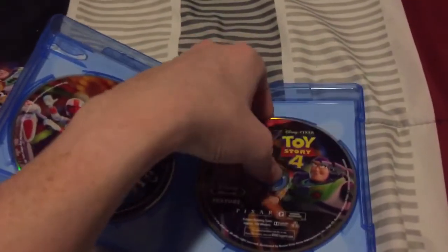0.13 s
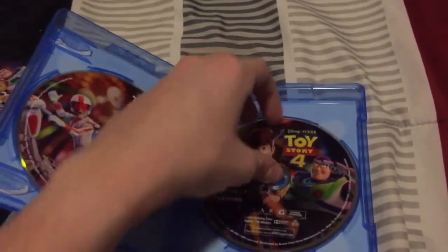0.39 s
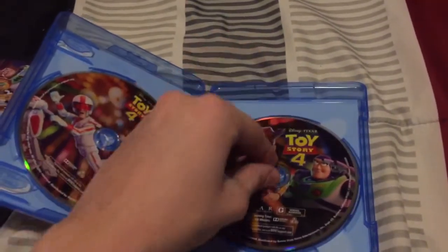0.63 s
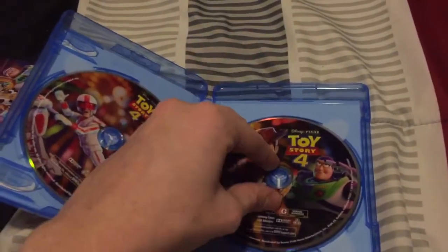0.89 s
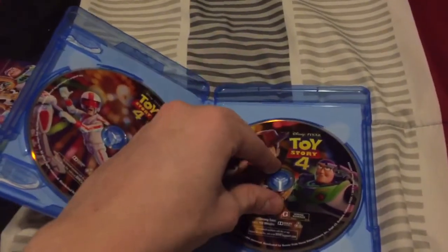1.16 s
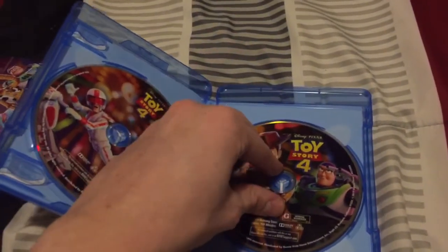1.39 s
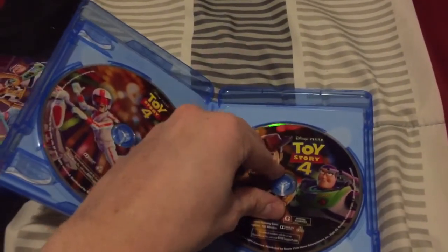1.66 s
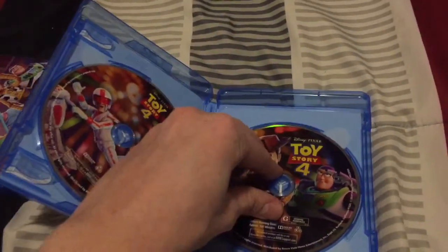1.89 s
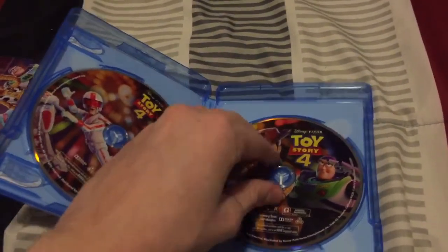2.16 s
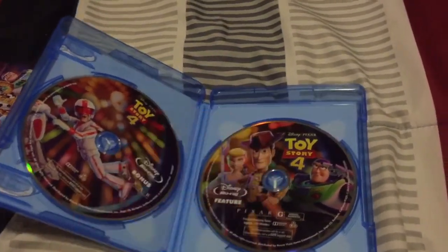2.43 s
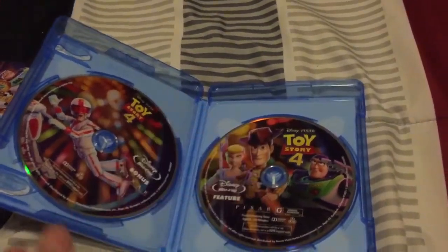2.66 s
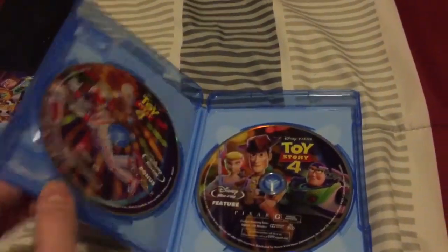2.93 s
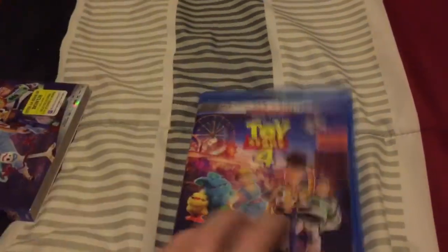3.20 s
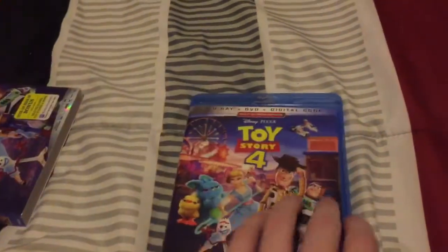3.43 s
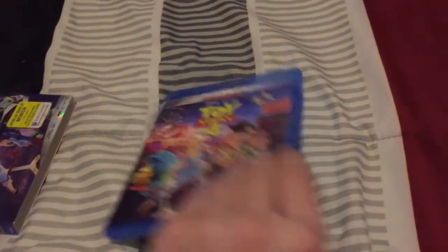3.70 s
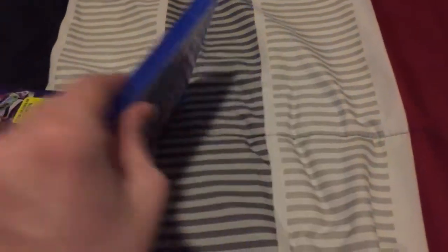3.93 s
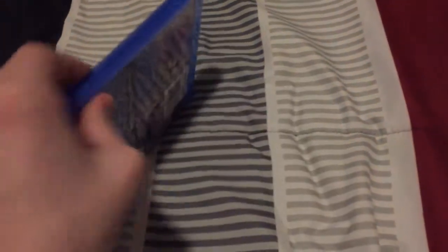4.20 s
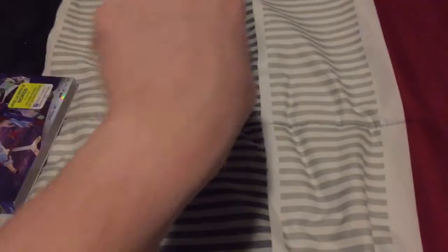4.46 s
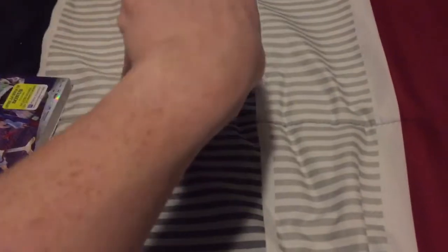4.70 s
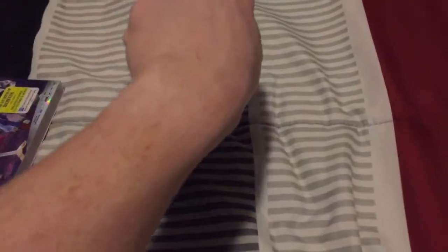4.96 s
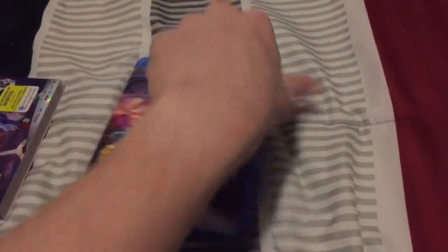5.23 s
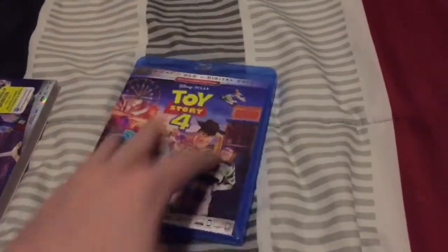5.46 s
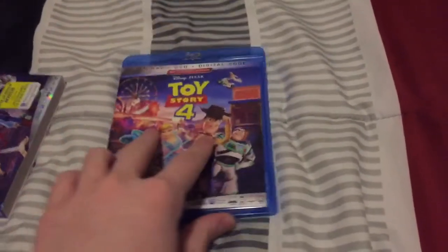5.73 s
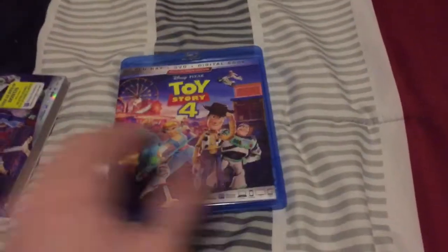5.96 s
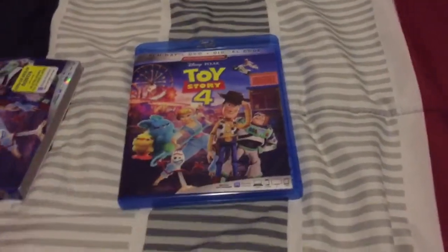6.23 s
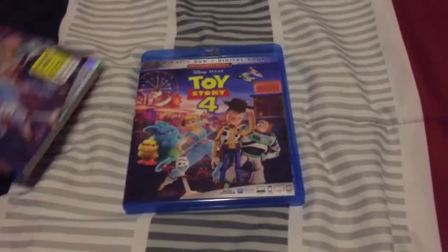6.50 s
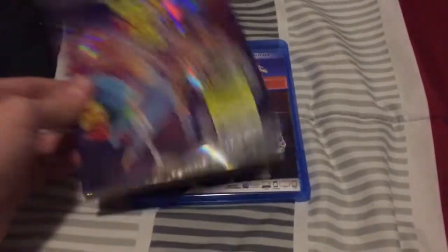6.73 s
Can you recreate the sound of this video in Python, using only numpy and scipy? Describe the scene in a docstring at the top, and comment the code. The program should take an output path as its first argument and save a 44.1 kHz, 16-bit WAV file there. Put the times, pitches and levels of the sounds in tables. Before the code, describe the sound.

Close to a small microphone in a soft-furnished room, a thin plastic disc case is handled. Faint clicks and scuffs come first, then a sharp snap with a low thump as the disc seats. Quiet hinge ticks and rustles lead to two very loud closing snaps about a second apart, softer clatter as it is put down, and a final moderate click. A low appliance hum and soft hiss continue throughout.

```python
"""Disc case handled on a bed

A thin plastic case snaps, clicks and ticks close to a small microphone: runs of slips ring shell and rib modes.
Fingers scuff the shell, crinkle the film sleeve and squeak once (banded grains); pushes thump (damped sines).
A small soft-furnished room answers (sparse decaying reflections); an appliance hums beyond the wall
(wavering tones, narrow noise bands) over broad hiss."""
import sys
import numpy as np
from scipy import signal
from scipy.fft import rfft, irfft, next_fast_len
from scipy.io import wavfile

SR = 44100
rng = np.random.default_rng(int(sys.argv[2]) if len(sys.argv) > 2 else 0)


def pcm_store(signal):
    """Save signal as 16-bit PCM."""
    levels = np.round(np.clip(np.atleast_2d(signal), -1, 1) * 32767)
    wavfile.write(sys.argv[1], SR, levels.astype(np.int16).T)


def boost_factor(decibels):
    """Convert a level in decibels to a linear amplitude factor."""
    exponent = np.asarray(decibels, float) / 20
    return 10 ** exponent


N = 302967  # samples

# brief ring of the case shell, before detuning and damping: mode_hz, level_db, t60_s
SHELL_MODES = [(746, -5.5, .008), (950.6, -1.5, 0.015), (1200, 0.5, 0.0089), (1474, 0, 0.0053),
               (1750, -8, 0.011), (2023, -2.5, 0.013), (2427, -1, 0.011), (2950, -3, 0.0098),
               (3480, -2.5, 0.012), (4230, 1, 0.0089), (5300, 2.5, 0.0055)]
# crack of ribs and clasps, before detuning and damping: mode_hz, level_db, t60_s
RIB_MODES = [(6300, 4, 0.004), (7200, -1.5, 0.0096), (8316, -4, 0.015), (9130, -2, .005),
             (9800, -8.5, 0.013), (11200, -5, .004), (11667, -6, 0.0026), (14300, -12.5, .003),
             (14500, -11.5, .003)]


def evened(x):
    """Scales to rms 1."""
    return x / np.sqrt(np.mean(x ** 2) + 1e-24)


def read(points, hz):
    """Interpolates a table on a log-frequency axis."""
    point_hz, value = np.transpose(points)
    return np.interp(np.log(hz + 1), np.log(point_hz + 1), value)


def add(mix, start_s, sound):
    """Mixes a sound in at start_s, cut at the end of the mix."""
    part = mix[round(start_s * SR):][:len(sound)]
    part += sound[:len(part)]


def coloured(x, points):
    """Filters x by a table of (hz, db), then scales to rms 1."""
    size = next_fast_len(len(x))
    gain = boost_factor(read(points, np.fft.rfftfreq(size, 1 / SR)))
    return evened(irfft(rfft(x, size) * gain, size)[:len(x)])


def clicks():
    """Quick slips excite shell and rib modes; the struck spot decides which modes sound."""
    # hard snaps of hub, clasps and landing case; level is rms over rattle + 2 ms, crack is relative to the shell:
    # start_s, level_db, rattle_ms, ring_centre_hz, crack_db
    snaps = [(0.1243, -33.5, 4.8, 2100, -8.5), (0.13, -33, 2.8, 1980, -7.5),
             (1.7233, -12.5, .74, 2300, -25.5), (1.73, -12.5, 2.3, 2310, -15.5),
             (1.7311, -8.5, 2.5, 1940, -9.5), (4.0573, -6.5, 3.6, 1982, -7), (4.0595, -8, 2, 1446, -14.5),
             (5.0255, -7.5, .72, 1695, -19), (5.0266, -7.5, 1.4, 1448, -32),
             (5.3121, -33.5, 4.7, 2240, -17), (5.3218, -31.5, 3, 1050, -8.5),
             (6.8315, -27.5, 5.4, 1910, -15), (6.8473, -20.5, 2.64, 1350, -23)]
    # light ticks of edges and hinge: start_s, level_db, ring_centre_hz, crack_db
    ticks = [(0.0892, -45, 2600, -22), (0.112, -51.5, 2800, 0), (.137, -41, 2170, -10),
             (0.345, -57, 2400, -41), (.4589, -56.5, 1810, -35), (0.613, -58, 1730, -21),
             (.629, -54, 1580, -35), (1.6159, -52.5, 1198, -38), (1.7083, -55, 2827, -22.5),
             (3.195, -43.5, 2300, -29), (3.206, -46.5, 1830, -9.5), (3.2735, -44.5, 1650, -10),
             (3.279, -46, 1410, -8.5), (3.514, -54, 1100, -16), (3.53, -57, 1200, -15),
             (4.0355, -54.5, 2200, -16.5), (4.047, -50, 1500, -14), (4.277, -56.5, 2000, -5),
             (4.4425, -53, 1200, -18), (4.456, -55, 1480, -10), (4.4919, -50, 1550, -21),
             (4.4991, -46.5, 1130, -16), (4.5314, -44, 1617, -30.5), (4.606, -58.5, 1200, -26),
             (4.8176, -52, 1566, -34), (4.8465, -44, 1500, -30.5), (4.9494, -53.5, 1803, -34.5),
             (5.003, -52.5, 1878, -20), (5.229, -42.5, 1550, -14.5), (5.243, -41, 1610, -14),
             (5.346, -42, 1680, -11.5), (5.355, -40, 1400, -13.5), (5.382, -53, 1600, -14),
             (5.532, -52, 4310, -3.5), (5.541, -53.5, 1130, -17), (6.316, -59, 2707, -25.5),
             (6.386, -52.5, 1840, -20), (6.405, -53.5, 2950, -7), (6.515, -61.5, 4200, -25),
             (6.543, -62.5, 2160, -25)]
    # octaves: reach into the modes; damping: a firm grip widens them; uneven_db: favouring of some modes
    snap_octaves, snap_damping, snap_uneven_db = .88, 1.1, 1.5
    tick_ms, tick_octaves, tick_damping, tick_uneven_db = 4.5, .7, .55, 5
    wall_damping, wall_crack_db = 1.4, 2.

    near = np.zeros(N)
    spread = np.zeros((3, N))  # feeds three reflection patterns, used in turn by successive clicks
    f = np.fft.rfftfreq(2048, 1 / SR) + 1
    spot_hz = np.geomspace(600, 8000, num=14)
    thin = (f / 2500) ** 4 / (1 + (f / 2500) ** 4)  # ribs are too small to radiate lows
    blows = [(*row, snap_octaves, snap_damping, snap_uneven_db) for row in snaps]
    for start_s, level_db, hz, crack_db in ticks:
        blows.append((start_s, level_db, tick_ms, hz, crack_db, tick_octaves, tick_damping, tick_uneven_db))

    draws = rng.standard_normal((len(blows), 660))
    for k, (blow, draw) in enumerate(zip(blows, draws)):
        start_s, level_db, rattle_ms, hz, crack_db, octaves, damping, uneven_db = blow
        count = int(np.clip(rattle_ms * SR / 1000, 8, 600))
        lean = (1 + (np.log2(f / hz) / octaves) ** 2) ** -2.2
        spot = np.interp(np.log(f), np.log(spot_hz), draw[640:654])
        lean = lean * boost_factor(uneven_db * spot) ** 2
        shell_detune = 1 + .015 * draw[600:600 + len(SHELL_MODES), None]
        rib_detune = 1 + .03 * draw[620:620 + len(RIB_MODES), None]
        size = boost_factor(level_db) * np.sqrt((rattle_ms + 2) * SR / 1000)
        # walls hear the shell from all sides: modes blurred, ribs stronger, no rattle pattern
        direct = (near, damping, 0, slips(draw[:count]))
        to_walls = (spread[k % len(spread)], wall_damping, wall_crack_db, [1])
        for mix, blur, extra_db, run in (direct, to_walls):
            body = modes_power(SHELL_MODES, f, shell_detune, blur) * lean
            crack = modes_power(RIB_MODES, f, rib_detune, blur) * thin
            power = body / body.sum() + boost_factor(crack_db + extra_db) ** 2 * crack
            sound = np.convolve(run, causal(power))
            add(mix, start_s, size * sound / np.linalg.norm(sound))
    return near, spread


def slips(draw):
    """A run of uneven slips whose energy is spread evenly over frequency."""
    run = draw ** 3 * np.exp(-1.2 * np.arange(len(draw)) / len(draw))
    run[0] = 2.5
    size = abs(run)
    for _ in range(4):  # alternate a flat spectrum with the wanted slip sizes
        z = rfft(run, 2 * len(run))
        run = irfft(z / (abs(z) + 1e-9))[:len(run)]
        run = np.sign(run) * np.sqrt(abs(run) * size)
    return run


def modes_power(modes, hz, detune, blur):
    """Power spectrum of damped modes, one resonance curve each; blur widens them. Sums to 1."""
    mode_hz, level_db, t60_s = np.transpose(modes)[:, :, None]
    half_hz = blur * 1.1 / t60_s
    power = (boost_factor(level_db) ** 2 * half_hz / ((hz - mode_hz * detune) ** 2 + half_hz ** 2)).sum(0)
    return power / power.sum()


def causal(power):
    """Minimum-phase ring: the sharpest one that starts at the blow and has this power spectrum."""
    cepstrum = irfft(.5 * np.log(power + 1e-12 * power.max()))
    cepstrum[1:len(cepstrum) // 2] *= 2
    cepstrum[len(cepstrum) // 2 + 1:] = 0
    ring = irfft(np.exp(rfft(cepstrum)))[:900]
    return ring / np.linalg.norm(ring)


def rubs():
    """Each rub is a swell of stick-slip grains in one band; scuffs also ring the case modes."""
    # fingers scuff the shell; level is rms before the swell: middle_s, length_s, level_db, centre_hz
    scuffs = [(0.122, 0.11, -53, 2430), (0.357, 0.018, -64.5, 2300), (0.461, 0.052, -61, 1920),
              (.62, 0.05, -51.5, 1700), (0.616, 0.038, -61.5, 5400), (0.641, 0.079, -60.5, 1370),
              (1.618, 0.026, -53, 1090), (3.207, 0.064, -49.5, 1200), (3.276, 0.11, -61, 1500),
              (3.428, .04, -79, 950), (3.452, 0.38, -69, 1412), (3.527, 0.073, -62.5, 1090),
              (3.595, 0.047, -65, 1000), (4.24, 0.29, -59, 1618), (4.53, 0.24, -64, 1622),
              (4.839, 0.17, -62.5, 1686), (4.648, 1, -78, 1590), (4.726, 0.037, -73, 1000),
              (4.927, 0.041, -61.5, 1100), (5.237, 0.044, -52.5, 2170), (5.257, 0.26, -56.5, 1480),
              (5.352, 0.074, -46, 1200), (5.388, 0.11, -60, 1130), (6.411, 0.11, -60.5, 3485),
              (6.54, .054, -66, 2914), (6.834, .05, -59.5, 2480)]
    # skin slides on the film sleeve; level is rms before the swell: middle_s, length_s, level_db
    slides = [(3.006, .1, -67.5), (3.291, 0.12, -64.5), (3.47, .2, -71), (3.818, .07, -79),
              (4.265, 0.076, -61), (4.396, 0.18, -67), (4.652, 0.061, -76), (4.791, 0.08, -70.5),
              (5.633, .093, -67), (5.747, 0.07, -69), (5.947, .055, -69)]
    # one short fingertip squeak: middle_s, length_s, pitch_hz
    squeak = (3.458, .045, 920)
    # partials of the squeak; level is rms before the swell: multiple, level_db
    squeak_partials = [(1, -66), (2, -64)]
    scuff_octaves, scuff_damping, scuff_detune = .7, .5, .9
    slide_hz, slide_octaves, squeak_octaves = 11500, 1, .09

    out = np.zeros(N)
    grit = grains(per_s=1300., spread_db=4.)
    squeak_s, squeak_length_s, squeak_hz = squeak
    strokes = [(*row, scuff_octaves, True) for row in scuffs]
    strokes += [(*row, slide_hz, slide_octaves, False) for row in slides]
    for multiple, level_db in squeak_partials:
        strokes.append((squeak_s, squeak_length_s, level_db, multiple * squeak_hz, squeak_octaves, False))
    for middle_s, length_s, level_db, hz, octaves, rings in strokes:
        start = round((middle_s - length_s / 2) * SR)
        part = grit[start:][:round(length_s * SR)]
        f = np.fft.rfftfreq(len(part), 1 / SR) + 1
        colour = np.exp(-.5 * (np.log2(f / hz) / octaves) ** 2)
        if rings:
            colour = colour * modes_power(SHELL_MODES + RIB_MODES, f, scuff_detune, scuff_damping) ** .5
        rub = evened(irfft(rfft(part) * colour, len(part)))
        add(out, start / SR, boost_factor(level_db) * rub * np.hanning(len(part)))
    return out


def grains(per_s, spread_db):
    """Sparse impulses of uneven size and random sign."""
    chance, size, sign = rng.random((N, 3)).T
    return (chance < per_s / SR) * boost_factor(-spread_db * np.log(size + .01)) * np.sign(sign - .5)


def thumps():
    """Each push is one low damped swing with a soft onset."""
    # case flexes or lands on the bedding; level is before onset and decay: start_s, level_db, pitch_hz
    pushes = [(.126, -32, 508), (1.73, -11, 168.3), (1.733, -5.5, 553.4), (3.199, -44.5, 340),
              (3.515, -40.5, 620), (4.0584, -8.5, 654), (5.025, -18, 381.5), (5.301, -24, 156),
              (5.317, -24.5, 300), (6.832, -19.5, 670), (6.848, -20.5, 391)]
    cycles_to_60_db, onset_s = 7.2, .001
    out, t = np.zeros(N), np.arange(SR // 5) / SR
    for start_s, level_db, hz in pushes:
        decay = boost_factor(level_db - 60 * t * hz / cycles_to_60_db)
        add(out, start_s, decay * np.sin(2 * np.pi * hz * t) * (1 - np.exp(-t / onset_s)))
    return out


def room(x):
    """Sparse reflections that build up over the first milliseconds, each band dying at its own speed."""
    # reverberation: hz, t60_s
    decay_points = [(150, 0.75), (500, .27), (1100, 0.34), (2200, 0.25), (4000, .29), (8000, 0.2),
                    (15000, 0.32)]
    # colour of the reflections: hz, relative_db
    colour_points = [(200, -6.5), (600, 0.5), (1500, -3), (4000, 3), (9000, -4.5), (16000, -7.5)]
    first, spacing, build_up_s = 200, 10, .002  # first, spacing: samples
    taps = np.zeros(SR // 2)
    at = np.arange(first, len(taps) - spacing, spacing)
    at = at + rng.integers(0, spacing, len(at))
    taps[at] = rng.choice([-1., 1.], len(at)) * (1 - np.exp(-(at - first) / SR / build_up_s))
    hz, t, z = signal.stft(taps, SR, nperseg=128)
    z = z * boost_factor(read(colour_points, hz)[:, None] - 60 * t / read(decay_points, hz)[:, None])
    tail = signal.istft(z, SR, nperseg=128)[1]
    return signal.oaconvolve(x, tail / np.linalg.norm(tail))[:N]


def background():
    """Two wavering motor tones, narrow noise bands and broad hiss."""
    # motor tones: pitch_hz, level_db, waver_db (rms)
    hum = [(56.3, -51.5, .5), (120, -57, 1.)]
    # appliance rumble gathered in the low room modes: centre_hz, width_hz, level_db (rms)
    rumble = [(80, 25, -60), (96, 8, -69), (129, 17, -62), (131.5, 22, -55), (168, 3.3, -65),
              (198, 16, -62.5), (222, 30, -63), (266, 81, -72.5)]
    # hiss spectrum: hz, relative_db (per Hz)
    hiss_points = [(150, -33.5), (250, -11), (337, -1.5), (361, -10.5), (644, -12.5), (1250, -18),
                   (2320, -19.5), (12900, -30.5), (15400, -30.5), (16500, -46.5)]
    hiss_db = -68  # rms

    t = np.arange(N) / SR
    out = boost_factor(hiss_db) * coloured(rng.standard_normal(N), hiss_points)
    waver_hz = np.geomspace(.3, 4, num=12)
    for hz, level_db, waver_db in hum:
        slow = evened(sum(np.sin(2 * np.pi * (f * t + rng.random())) / np.sqrt(f) for f in waver_hz))
        tone = np.sin(2 * np.pi * (hz * t + rng.random()))
        out += np.sqrt(2) * boost_factor(level_db + waver_db * slow) * tone
    f = np.fft.rfftfreq(N, 1 / SR)
    for hz, width_hz, level_db in rumble:
        band = 1 / (1 + (2 * (f - hz) / width_hz) ** 2)
        out += boost_factor(level_db) * evened(irfft(rfft(rng.standard_normal(N)) * band, N))
    return out


def scene():
    """The case close by, its room, and the steady background."""
    room_db = -16.5
    near, spread = clicks()
    soft = thumps() + rubs()
    spread[0] += soft
    reflections = boost_factor(room_db) * sum(room(part) for part in spread)
    return (near + soft + reflections + background())[None]


def roll_off(x):
    """The treble ends steeply here."""
    return signal.sosfilt(signal.butter(12, 16740, fs=SR, output="sos"), x)


def record(dry):
    """The microphone drops the deepest bass and dips in the treble; the loudest snaps are rounded off."""
    cut_hz, dip_hz, dip_q, dip_depth = 44., 10500., 9., .3
    ceiling = .96  # of full scale
    thin = signal.sosfilt(signal.butter(4, cut_hz, "high", fs=SR, output="sos"), dry)
    thin = thin - dip_depth * signal.lfilter(*signal.iirpeak(dip_hz, dip_q, SR), thin)
    rounded = ceiling * np.tanh(thin / ceiling)
    return roll_off(rounded)


dry = scene()
out = record(dry)
pcm_store(out)
```